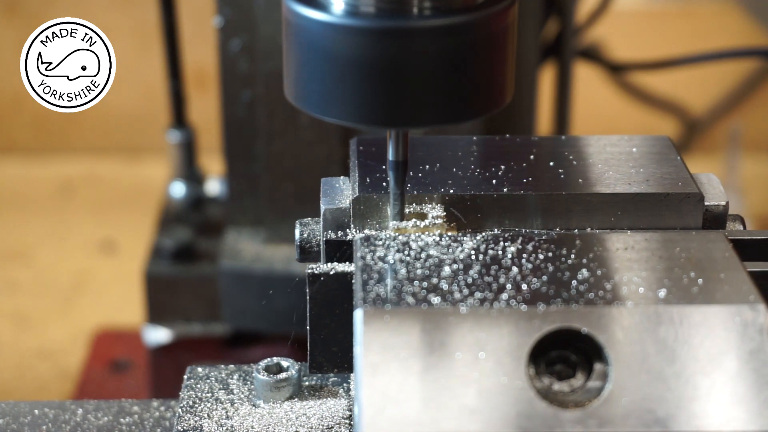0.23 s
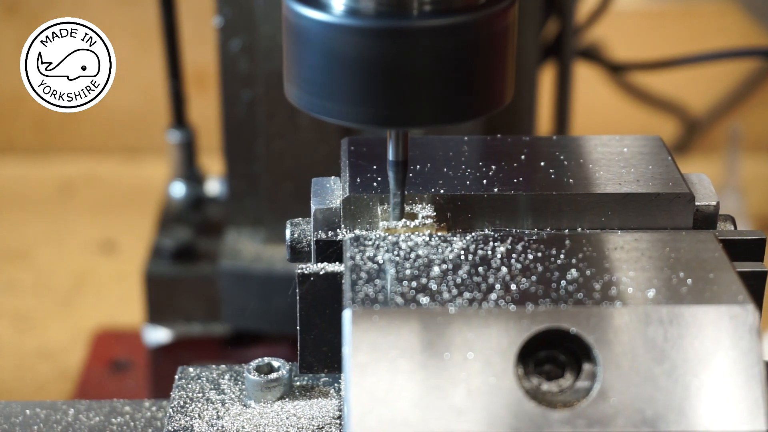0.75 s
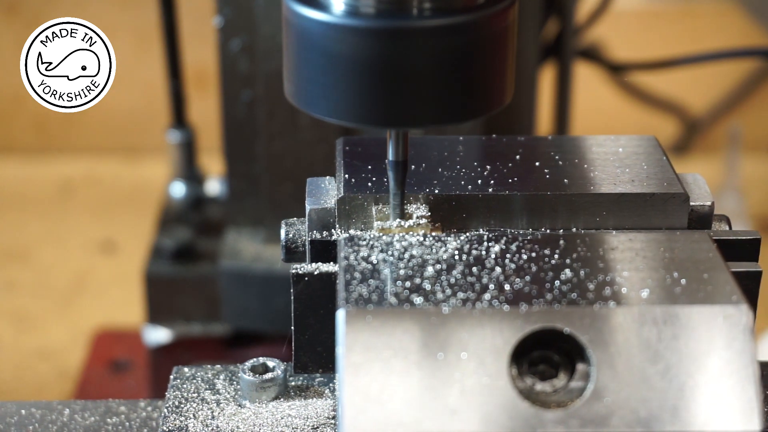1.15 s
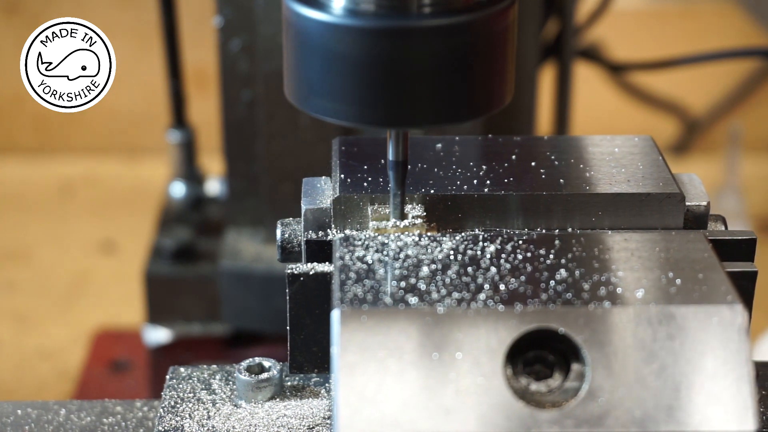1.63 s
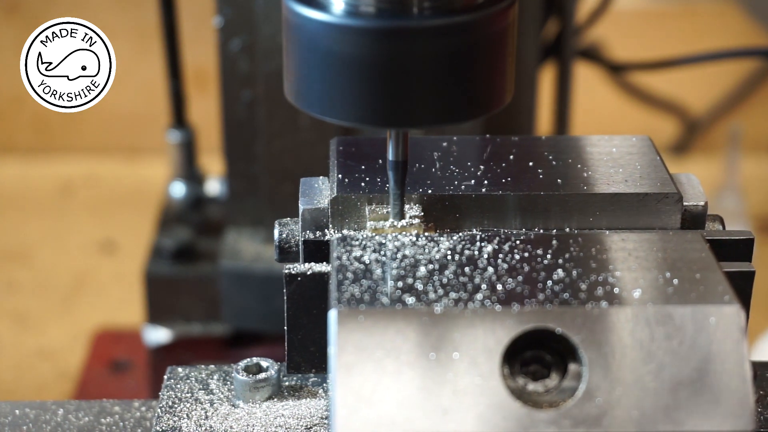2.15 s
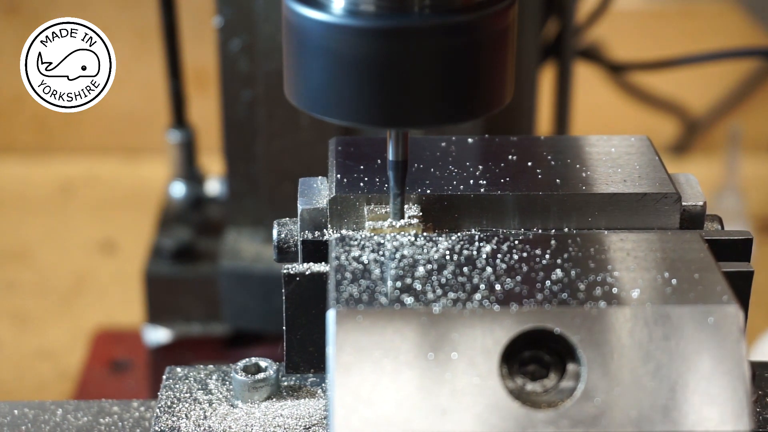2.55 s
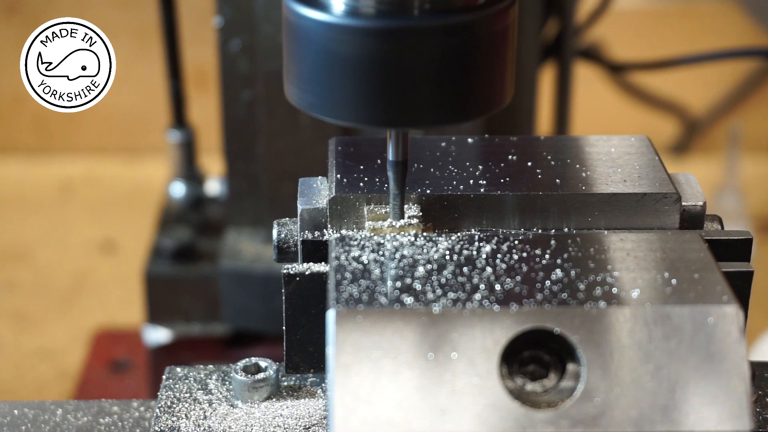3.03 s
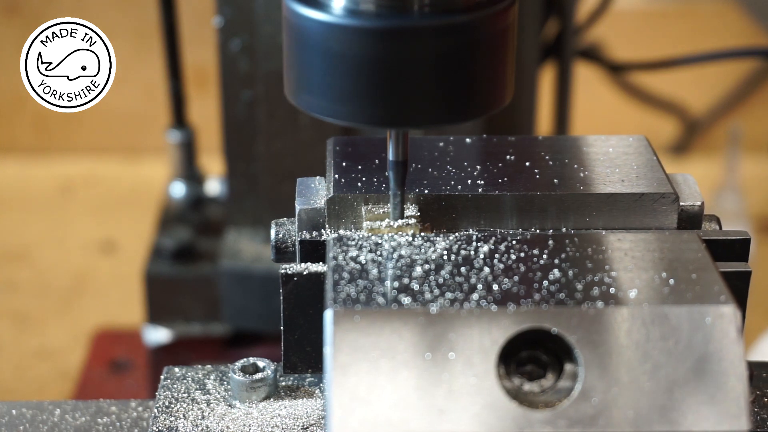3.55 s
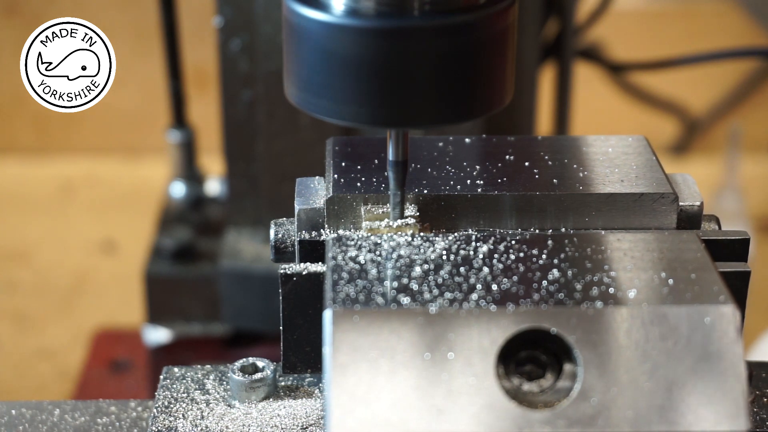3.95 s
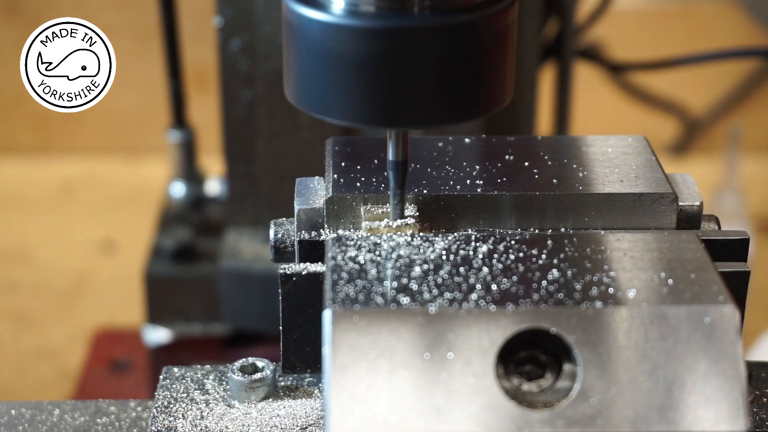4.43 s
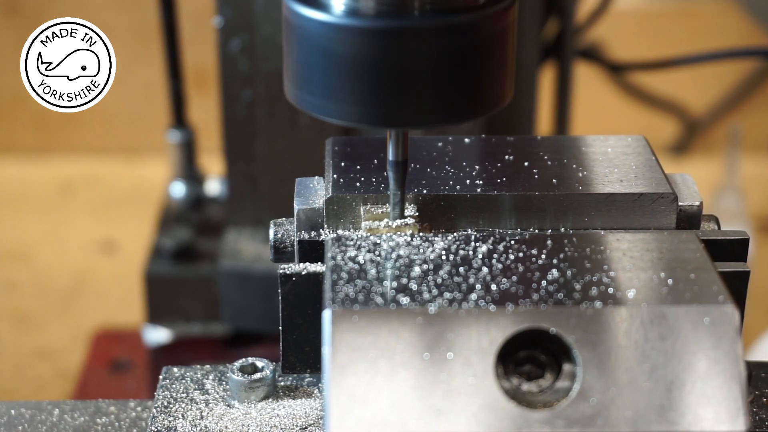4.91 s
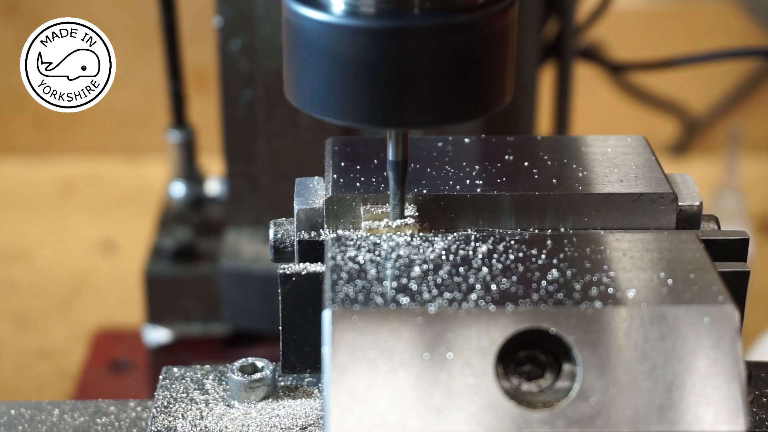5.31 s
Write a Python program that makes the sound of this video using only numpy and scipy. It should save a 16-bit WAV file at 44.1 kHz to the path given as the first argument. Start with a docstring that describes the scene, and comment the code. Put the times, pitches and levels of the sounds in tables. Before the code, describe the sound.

A small milling machine whines steadily while its cutter grinds metal with gritty hiss, rattling bearings and rapid squeaky chirps that come and go.

```python
"""Small milling machine cutting brass

Heard close by in a home workshop: shaft-locked tones of gears and bearings waver over a grinding hiss.
Filtered noise and showers of clicks make the grinding, rattle, rumble and whirr; sines make the hum.
The two flutes of the end mill rub the slot wall and chirp once a turn, mostly early on and at the end,
by stick-slip: a rough rising tone with overtones. Steady high tones are the motor's speed control."""
import sys
import numpy as np
from scipy import signal
from scipy.fft import rfft, irfft
from scipy.io import wavfile

SR = 44100
rng = np.random.default_rng(int(sys.argv[2]) if len(sys.argv) > 2 else 0)


def wrap_up_sound(samples):
    """Save the sound to the file named by the first command line argument, as 16-bit audio."""
    columns = np.atleast_2d(samples).T
    # keep every value between -1 and 1, then stretch to whole-number steps
    tamed = np.clip(columns, -1, 1)
    steps = np.round(tamed * 32767).astype(np.int16)
    wavfile.write(sys.argv[1], SR, steps)


N = 246078
TIME = np.arange(N) / SR  # s
BINS = np.fft.rfftfreq(N, 1 / SR)  # Hz

# Spindle speed before its small wander: (time [s], speed [turns per s])
SPINDLE_SPEED = [(0.0, 28.209), (0.81, 28.217), (1.26, 27.982), (1.53, 28.09), (1.71, 28.195),
                 (3.06, 28.212), (3.15, 28.11), (3.42, 28.185), (3.6, 28.053), (4.05, 28.175),
                 (4.14, 28.023), (4.32, 28.168), (4.95, 28.027), (5.58, 28.139)]
WANDER_TURNS, WANDER_HZ = .003, 4  # rms shift of the spindle angle, and its rough upper rate
# How hard the tool cuts: (time [s], level relative to full load [dB])
CUTTING_LOAD = [(0, -5), (0.6, -8), (1.0, -6), (1.55, -5), (2.0, -1), (2.2, -5), (2.4, -0.8), (3.1, -0.5),
                (3.45, 0.5), (4.3, -0.1), (5.3, 0), (5.43, -6.5), (5.58, -7)]
# What follows the load: (level at full load [dB], slope [dB per dB of load])
DRONE_LAW, WHINE_LAW = (-26.5, 0.4), (-25, 1.0)
RING_LAW, MOAN_LAW = (-31, 0.76), (-51, .4)
GRINDING_LAW, RATTLE_LAW, HISS_LAW = (-29.5, .8), (-32, 1.0), (-27.5, 0.63)
RUMBLE_LAW, WHIRR_LAW = (-46.5, 0.76), (-23, 0.72)

# Close gear tones of the drive: (pitch at mean speed [Hz])
DRONE_HZ = [1000.5, 1012.5, 1024.5]
# Their balance: (relative level [dB], left-right difference [dB], phase lead of the left side [rad])
DRONE_BALANCE = [(-2, -2, .1), (-8, -1, .1), (-9.5, -6, .1)]
# Wavering bearing tones of the drive: (pitch at mean speed, before slip [Hz])
WHINE_HZ = [829, 919, 1045, 1070, 1129, 1177.4, 1251.5, 1308, 1348, 1434, 1825, 1967, 2317, 2504, 3046]
# Their balance: (relative level [dB], left-right difference [dB], phase lead of the left side [rad])
WHINE_BALANCE = [(-20, 0, 0), (-29, -2, 0), (-11.5, -4, 0.44), (-14, -4, 0.1), (-13, 2, -0.08),
                 (-5, 0.5, 0.32), (-2, 2, 1), (-6.5, 7.5, -0.22), (-20, 0, 0), (-21, 2, 0),
                 (-20.5, -13, -0.2), (-15, 6, 0.24), (-10.5, -6, -0.13), (-7, -5.5, 0.0079),
                 (-16, -13, 0.21)]
HOUSING_HZ = 2219  # ring of the housing at mean speed
RING_SWELL_DB, RING_SWELL_HZ = 0.9, 7.3  # rms of its chance swell, and the swell's rough upper rate
# Midway the drive changes its voice: the gear drone swells and the low moan fades
SHIFT_S, SHIFT_LENGTH_S, SHIFT_DRONE_DB, SHIFT_MOAN_DB = 3.03, 0.37, 6.5, -12

# Spectral shape of the chips' gritty grinding: (frequency [Hz], relative level [dB])
GRINDING_SPECTRUM = [(1800, -19), (3100, -4), (3600, -5.5), (4300, 9.5), (4600, -3), (6100, 3), (6700, -27),
                     (9000, -42)]
# Spectral shape of the bearing balls' rattle: (frequency [Hz], relative level [dB])
RATTLE_SPECTRUM = [(2700, -29.5), (2950, -17), (3044, 0), (3150, -8.5), (3450, -6), (3550, -2.5),
                   (3740, -0.5), (3850, -31), (4500, -24)]
# Spectral shape of the cutting hiss: (frequency [Hz], relative level [dB])
HISS_SPECTRUM = [(4500, -32), (6200, 3), (7000, -2), (8400, 2.5), (9000, -7), (9450, 7), (9900, -1.5),
                 (10800, 2), (12500, -4.5), (14000, -7), (15700, 1.5)]

# Spells of rubbing: (start [s], end [s], first flute's tone [relative dB], its overtones [relative dB],
# second flute's tone [relative dB], its overtones [relative dB], dulling of the overtones [dB per s],
# second flute's upward bend [share of its pitch], arc of contact [share of the full arc])
RUBBING_SPELLS = [(-0.1, 1.081, -24, -20, -21, -23, 2, .1, 0.98),
                  (1.0, 1.87, -23, -29, -22.5, -21.5, 8.5, 0.2, 1),
                  (2.08, 2.339, -23, -41, -19.5, -26, 8, .21, 1),
                  (2.4, 2.716, -31, -38, -30, -40, 3, 0.044, 1),
                  (3.061, 3.617, -27, -33, -27.5, -29.5, 14, .14, 1),
                  (5.288, 5.7, -26.5, -21, -24, -35, -17, 0.047, 0.59)]
RUB_ATTACK_S, RUB_RELEASE_S = .06, .09
# Pitch at which the chirps start, before chance scatter: (time [s], first flute [Hz], second flute [Hz])
CHIRP_PITCH = [(0, 3715, 3899), (0.13, 3820, 4077), (0.3, 3430, 3700), (0.5, 3380, 3630),
               (0.95, 3600, 3900), (1.05, 4130, 4300), (1.45, 4120, 4450), (1.8, 4100, 4920),
               (2.2, 4000, 4590), (2.6, 3600, 4223), (3.5, 3800, 4270), (5.4, 4420, 5170)]
FIRST_BEND, GRAZE_DB = .17, -41  # first flute's bend (share of pitch); light grazing kept up between spells
CONTACT_AT = .76  # point of the turn about which both contacts are placed (turns)
# Spectral shape of the chirps' overtones and upper scrape: (frequency [Hz], relative level [dB])
TOOL_SPECTRUM = [(3000, -40), (6000, 11), (7500, 8), (8400, 5), (9000, 9), (9700, 8), (10900, 10.5),
                 (11700, 2), (12500, 2), (13500, -7), (14600, 6), (16000, -13)]
PART_HZ, PART_WIDTH_HZ, PART_DB = 4250, 83, 6  # resonance of the brass part, its peak over the rest
# Resonances of the head and vice: (frequency [Hz], width [Hz], peak of the added power over the rest [dB])
BODY_MODES = [(1824, 23, 6.5), (2204, 89, 5.5), (2500, 57, 10), (2666, 31, 13.5), (2870, 66, 10.5),
              (3080, 34, 6), (3320, 20, 14.5), (3570, 11, 21.5), (3743, 21, 21), (4046, 20, 13.5),
              (4600, 31, 13.5), (4865, 80, 13), (5290, 205, 8.5), (6037, 54, 11)]

# Thrum of the cut: (multiple of the spindle speed [turns per turn])
THRUM_ORDERS = [3, 4, 5, 6, 8, 9, 11, 12, 13, 15]
# Balance of those multiples: (relative level [dB])
THRUM_BALANCE = [-2, -1.5, -27, -20, -2, -8.5, -7, -6.5, -6, -9]
# Swell of the thrum and shudder together: (time [s], level [dB])
THRUM_LEVEL = [(0, -57), (0.9, -56), (2.6, -60), (3.05, -74), (3.25, -56.5), (3.55, -57.5), (4.45, -81),
               (5.1, -69), (5.58, -80)]
# Spectral shape of the frame's shudder: (frequency [Hz], relative level [dB])
SHUDDER_SPECTRUM = [(20, -9), (55, -5), (90, -2), (280, 2), (450, -10), (800, -27)]
# Spectral shape of the rumble: (frequency [Hz], relative level [dB])
RUMBLE_SPECTRUM = [(20, -34), (60, -30), (100, -30), (150, -16), (260, -10), (380, -5), (480, 4.5),
                   (600, -1.5), (800, 1.5), (1200, -28)]
# Spectral shape of the whirr: (frequency [Hz], relative level [dB])
WHIRR_SPECTRUM = [(400, -79), (620, -6), (790, -6.5), (850, 4), (940, 4), (1050, 9), (1220, 5), (1400, 5.5),
                  (1490, -3.5), (1650, 5), (2040, -3.5), (2120, 8.5), (2700, -3), (3400, -10)]
HUM_HZ, HUM_DB, THROB_DB = 163.4, -64.5, 4.5  # motor hum: pitch, middle level, throb to either side of it
THROB_S, FIRST_THROB_S = .2492, .035  # time from one throb to the next, and the first throb

# Switching tone of the speed control and its sidebands: (frequency [Hz])
SWITCHING_HZ = [14756, 14866.7, 15204.6, 15317.2, 15429.7, 15542.2, 15654.8]
# Their balance: (relative level [dB], left-right difference [dB], phase lead of the left side [rad])
SWITCHING_BALANCE = [(-54, 0, 0), (-56, 0, 0), (-55, 0, 0), (-55, 0, 0), (-34.5, -4, -.8), (-47, 0, -.1),
                     (-27.5, 1.5, 1.6)]

# Likeness of the two sides, limited to 0-1 in use: (frequency [Hz], correlation [-1 to 1])
SIDE_LIKENESS = [(100, 3.5), (300, 1.2), (1000, 0.5), (2000, 0.75), (4000, 0.67), (8000, 0.55),
                 (15000, 0.47)]
# Lean of the diffuse sounds: (frequency [Hz], left-right difference [dB])
SIDE_TILT = [(200, 1), (900, 1), (1800, 0.5), (2700, -1.2), (4200, -1), (9000, -0.24), (15000, -1)]
EDGE_HZ = 15780  # upper band edge of the whole sound


def amp(db):
    """Logarithmic level: decibels to amplitude gain."""
    return 10 ** (np.asarray(db) / 20)


def unit(x):
    """Normalization: scales to rms 1."""
    return x / np.sqrt(np.mean(x ** 2) + 1e-20)


def curves(rows):
    """Linear interpolation: each column of a table, sample by sample."""
    s, *columns = np.transpose(rows)
    return [np.interp(TIME, s, column) for column in columns]


def spectrum(points):
    """Spectral envelope: a short table read on a log-frequency axis."""
    hz, value = np.transpose(points)
    return np.interp(np.log(BINS + 1), np.log(hz + 1), value)


def drift(hz):
    """Low-passed noise: smooth chance of rms 1, mostly slower than hz."""
    return unit(irfft(rfft(rng.standard_normal(N)) / (1 + (BINS / hz) ** 4), N))


def shaped_noise(points):
    """Subtractive synthesis: one channel of noise with a tabled spectrum, rms 1."""
    return unit(irfft(rfft(rng.standard_normal(N)) * amp(spectrum(points)), N))


def grit(per_s, spread_db):
    """Shot noise: two unrelated showers of tiny clicks of uneven size."""
    size = amp(spread_db * np.minimum(rng.exponential(1, (2, N)), 4))
    strikes = rng.random((2, N)) < per_s / SR
    return unit(size * rng.standard_normal((2, N)) * strikes)


def spread(pair, gain):
    """Partial coherence: two signals become the mid (scaled to rms 1) and side of a coloured stereo pair."""
    bass_loss = BINS ** 2 / np.hypot(BINS ** 2, 120 ** 2)  # the diffuse sounds carry little deep bass
    mid, side = rfft(pair) * bass_loss
    same = np.clip(spectrum(SIDE_LIKENESS), 0, 1)
    side = side * np.sqrt((1 - same) / (1 + same))
    lean = amp(spectrum(SIDE_TILT) / 2)
    scale = np.std(irfft(mid * gain, N))
    return irfft(np.array([(mid + side) * lean, (mid - side) / lean]) * gain, N) / scale


def place(tone, pan_db, lead):
    """Interaural difference: a complex tone with a level and a phase difference between the sides."""
    side = np.array([[.5], [-.5]])
    return np.sqrt(2) * (tone * amp(side * pan_db) * np.exp(1j * side * lead)).real


def loaded(law):
    """Power law: gain of a voice that follows the load on the tool."""
    full_db, slope = law
    load_db, = curves(CUTTING_LOAD)
    return amp(full_db + slope * load_db)


def body():
    """Modal resonance: gain of the machine's metal, powers of its modes added."""
    modes = sum(amp(db) ** 2 / (1 + (2 * (BINS - hz) / width) ** 2) for hz, width, db in BODY_MODES)
    return np.sqrt(1 + modes)


def running_tone(cycles, fuzz, fuzz_hz):
    """Random modulation: a rolling part's tone, a clean core with a restless skirt."""
    skirt = (drift(fuzz_hz) + 1j * drift(fuzz_hz)) / np.sqrt(2)
    core = np.exp(2j * np.pi * (cycles + rng.random()))
    return core * (1 + fuzz * skirt) / np.hypot(1, fuzz)


def tone_bank(pitches, balance, clock, fuzz, fuzz_hz):
    """Superposition: rolling tones that share one shaft clock."""
    return sum(amp(db) * place(running_tone(hz * clock, fuzz, fuzz_hz), pan, lead)
               for hz, (db, pan, lead) in zip(pitches, balance))


def drive(turns, pace):
    """Shaft-locked tones: gears and bearings sing at multiples of the speed; close gear tones beat."""
    drone = tone_bank(DRONE_HZ, DRONE_BALANCE, pace, fuzz=0.13, fuzz_hz=14)
    # the bearing balls slip a little, so their tones waver together
    slip = .0016 * np.cumsum(drift(5)) / SR
    whine = tone_bank(WHINE_HZ, WHINE_BALANCE, pace + slip, fuzz=0.29, fuzz_hz=34)
    ring = place(running_tone(HOUSING_HZ * pace, fuzz=0.47, fuzz_hz=12), pan_db=-6.5, lead=0)
    ring_swell = amp(RING_SWELL_DB * drift(RING_SWELL_HZ))
    moan = place(running_tone(16 * turns, fuzz=.25, fuzz_hz=5), pan_db=-1, lead=0)
    shift = np.clip((TIME - SHIFT_S) / SHIFT_LENGTH_S, 0, 1)
    gears = loaded(DRONE_LAW) * amp(SHIFT_DRONE_DB * (shift - 1)) * drone
    low_moan = loaded(MOAN_LAW) * amp(SHIFT_MOAN_DB * shift) * moan
    return gears + loaded(WHINE_LAW) * whine + loaded(RING_LAW) * ring_swell * ring + low_moan


def cutting(turns):
    """Impulsive excitation: chips break off in a gritty hiss; balls rattle, harder on one side of the turn."""
    balls_per_turn = 6.351
    knocks = np.exp(-((balls_per_turn * turns) % 1) / 0.18)
    loaded_side = amp(6.9 * np.cos(2 * np.pi * (turns - .74)))
    rattle_noise = rng.standard_normal((2, N)) * knocks * loaded_side
    rattle = spread(rattle_noise, amp(spectrum(RATTLE_SPECTRUM)))
    chips = grit(per_s=9000, spread_db=1.5) * amp(1.4 * drift(48))
    grinding = spread(chips, amp(spectrum(GRINDING_SPECTRUM)) * body())
    fine_chips = grit(per_s=13000, spread_db=1.5) * amp(1.46 * drift(80))
    hiss = spread(fine_chips, amp(spectrum(HISS_SPECTRUM)))
    return loaded(GRINDING_LAW) * grinding + loaded(RATTLE_LAW) * rattle + loaded(HISS_LAW) * hiss


def flute(turns, low, high, hz, rise, centre, length, scrape_db):
    """Stick-slip friction: for part of each turn a flute rubs, a rough chirp bending ever faster upward."""
    # no two turns are quite alike in timing, force or pitch
    turn = np.floor(turns - centre + .5).astype(int) + 1
    late, strong, sharp = rng.standard_normal((turn[-1] + 1, 3))[turn].T
    along = ((turns - centre + .5) % 1 - .5 - 0.0118 * late) / length  # -0.5 to 0.5 across the contact
    contact = np.exp(-(2 * along) ** 4) * amp(.5 * strong + .5 * drift(220))
    pitch = hz * (1 + rise * np.clip(along + .5, 0, 1) ** 2 + .02 * sharp)
    angle = 2 * np.pi * np.cumsum(pitch * (1 + .043 * drift(450))) / SR
    # the tone reaches both sides alike; the scraping around it is diffuse
    scrape = rng.standard_normal((2, N))
    band = amp(spectrum([(2800, -38), (3500, 8.5), (5400, 13.0), (7000, -16), (12000, -40)]))
    fundamental = 1.15 * np.sin(angle) + .58 * spread(scrape, band * body())
    colour = amp(spectrum(TOOL_SPECTRUM))
    overtones = sum(np.sin(k * angle) * (k * pitch < SR / 2) for k in range(2, 5))
    coloured_overtones = unit(irfft(rfft(overtones) * colour, N))
    upper = unit(coloured_overtones + amp(scrape_db) * spread(scrape, colour))
    return contact * (low * fundamental + high * upper)


def rubbing(turns):
    """Forced resonance: in each spell the flutes bear on the slot wall, and the brass part rings along."""
    columns = np.transpose(RUBBING_SPELLS)[:, :, None]
    start, end, first_db, first_over_db, second_db, second_over_db, dulling, bend, arc = columns
    attack = np.clip((TIME - start) / RUB_ATTACK_S, 0, 1)
    press = attack * np.clip((end - TIME) / RUB_RELEASE_S, 0, 1)
    bright = press * amp(-dulling * np.maximum(TIME - start, 0))

    def with_graze(shape, db):
        """Power addition: the spells' gain joined to the light grazing."""
        return np.hypot(amp(GRAZE_DB), (shape * amp(db)).sum(0))

    first_low, first_high = with_graze(press, first_db), with_graze(bright, first_over_db)
    second_low, second_high = with_graze(press, second_db), with_graze(bright, second_over_db)
    first_hz, second_hz = curves(CHIRP_PITCH)
    bend = (press * bend).sum(0)
    arc = 1 + (press * (arc - 1)).sum(0)
    first = flute(turns, first_low, first_high, first_hz, FIRST_BEND,
                  centre=CONTACT_AT - .08 * arc, length=.21 * arc, scrape_db=-1.5)
    second = flute(turns, second_low, second_high, second_hz, bend,
                   centre=CONTACT_AT + .18 * arc, length=.3 * arc, scrape_db=-5)
    part = 1 + (amp(PART_DB) - 1) / (1 + 2j * (BINS - PART_HZ) / PART_WIDTH_HZ)
    return irfft(rfft(first + second) * part, N)


def frame(turns):
    """Forced vibration: cutting force shakes the frame at spindle multiples, over hum, rumble and whirr."""
    thrum_db, = curves(THRUM_LEVEL)
    thrum = sum(amp(db) * running_tone(order * turns, fuzz=0.18, fuzz_hz=1.9).real
                for order, db in zip(THRUM_ORDERS, THRUM_BALANCE))
    shudder = amp(-5.5) * shaped_noise(SHUDDER_SPECTRUM)
    throb = np.cos(2 * np.pi * (TIME - FIRST_THROB_S) / THROB_S)
    hum = amp(HUM_DB + THROB_DB * throb) * np.sin(2 * np.pi * HUM_HZ * TIME)
    rumble = spread(rng.standard_normal((2, N)), amp(spectrum(RUMBLE_SPECTRUM)))
    whirr = spread(grit(per_s=9000, spread_db=2.5), amp(spectrum(WHIRR_SPECTRUM)) * body())
    shaking = amp(thrum_db) * (np.sqrt(2) * thrum + shudder)
    return shaking + np.sqrt(2) * hum + loaded(RUMBLE_LAW) * rumble + loaded(WHIRR_LAW) * whirr


def speed_control():
    """Electromagnetic excitation: the switched motor current sings; its loudness wavers on each side."""
    swell_db, = curves([(0, -3), (1, -5), (2.1, 0.5), (3.2, -0.5), (4.4, 2.5), (5.58, -2.5)])
    total = 0
    for hz, (db, pan, lead) in zip(SWITCHING_HZ, SWITCHING_BALANCE):
        tone = place(np.exp(2j * np.pi * (hz * TIME + rng.random())), pan, lead)
        waver = amp(1.8 * np.array([drift(1.5), drift(1.5)]))
        total = total + amp(db) * tone * waver
    return amp(swell_db) * total


def workshop(x, t60, wet_db):
    """Early reflection: decaying sparse echoes from the vice, the column and the wall behind."""
    t = np.arange(SR // 4) / SR
    arrivals = rng.random((2, len(t))) < 2500 / SR  # 2500 echoes per second
    taps = rng.standard_normal((2, len(t))) * arrivals * amp(-60 * t / t60)
    taps /= np.linalg.norm(taps, axis=1, keepdims=True)
    return x + amp(wet_db) * signal.fftconvolve(x, taps, axes=1)[:, :N]


def scene():
    """Superposition: the sources add; shaft tones, knocks and chirps share one spindle angle."""
    speed, = curves(SPINDLE_SPEED)
    turns = np.cumsum(speed) / SR + WANDER_TURNS * drift(WANDER_HZ)
    pace = turns / speed.mean()  # seconds, as the shafts count them
    chirps = workshop(rubbing(turns), t60=0.079, wet_db=-3.0)
    return drive(turns, pace) + cutting(turns) + chirps + frame(turns) + speed_control()


def record(dry):
    """Band limitation: a steep low-pass, 100 Hz wide, about the upper edge."""
    return irfft(rfft(dry) * np.clip((EDGE_HZ - BINS) / 100 + .5, 0, 1), N)


dry = scene()
out = record(dry)
wrap_up_sound(out)
```